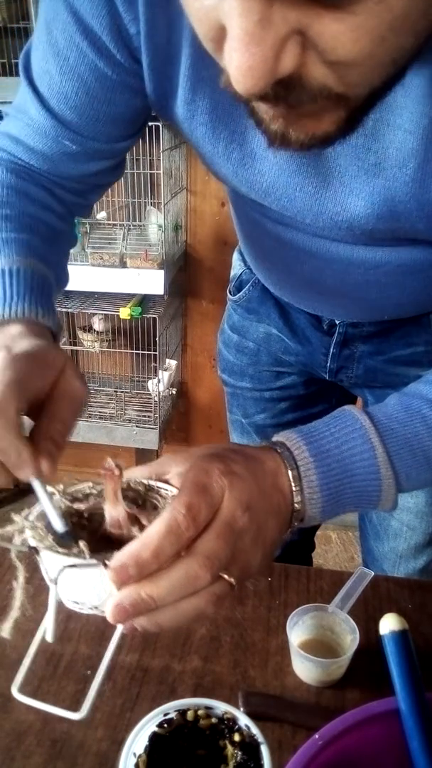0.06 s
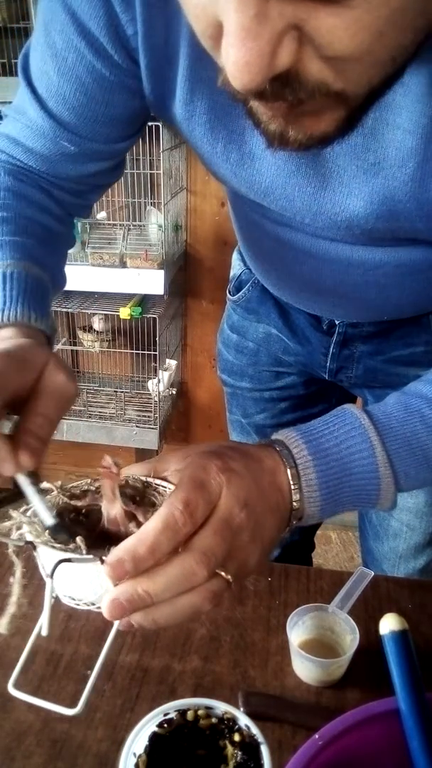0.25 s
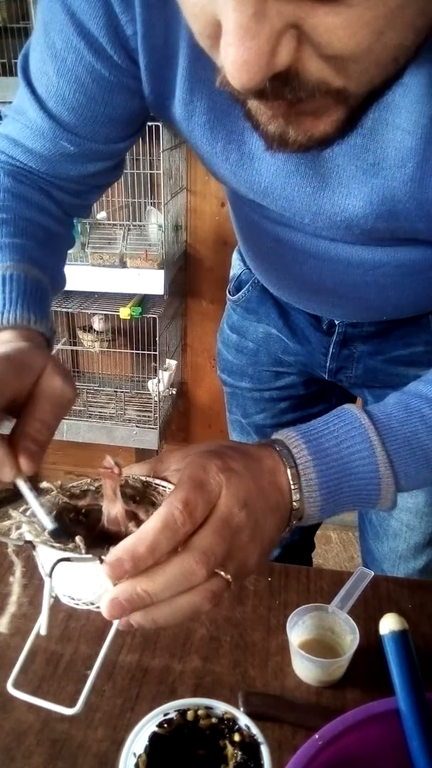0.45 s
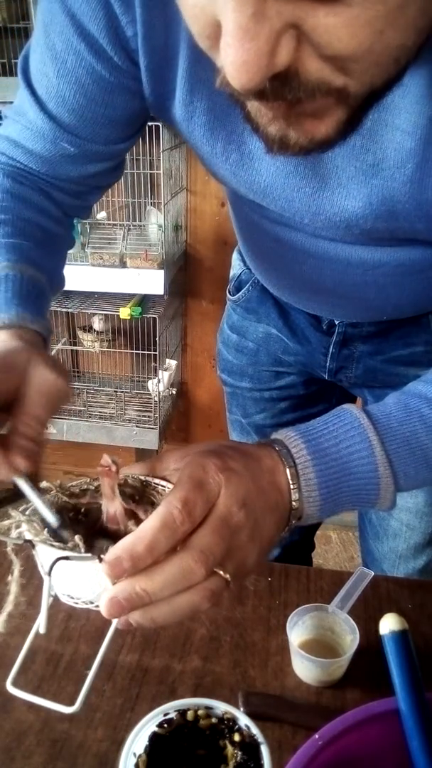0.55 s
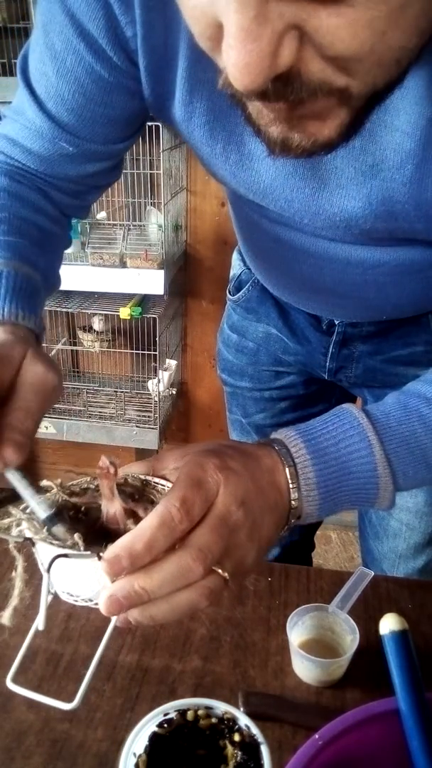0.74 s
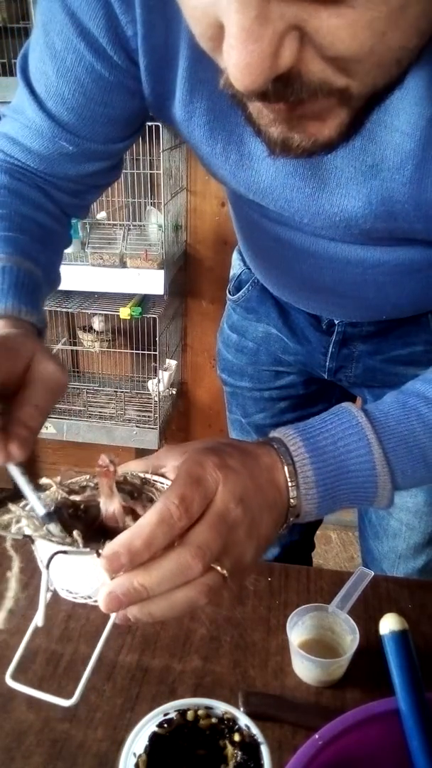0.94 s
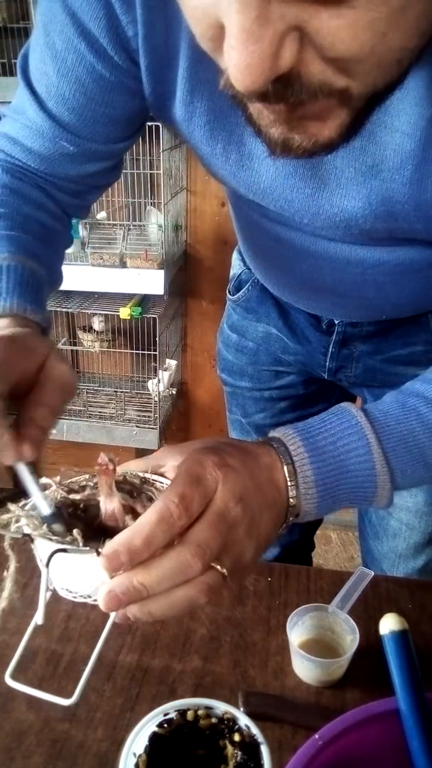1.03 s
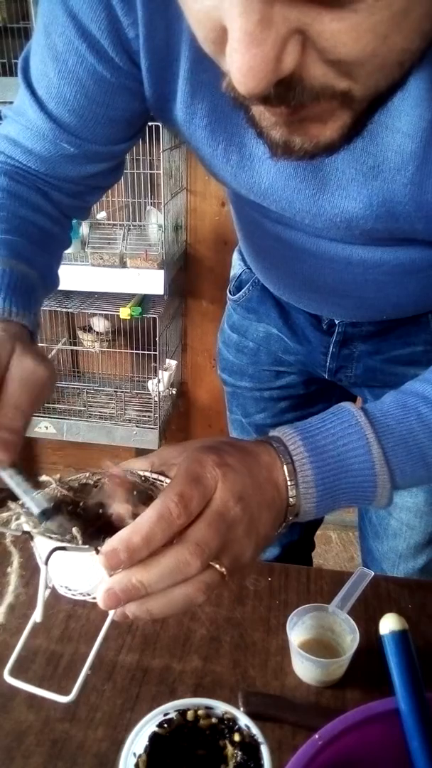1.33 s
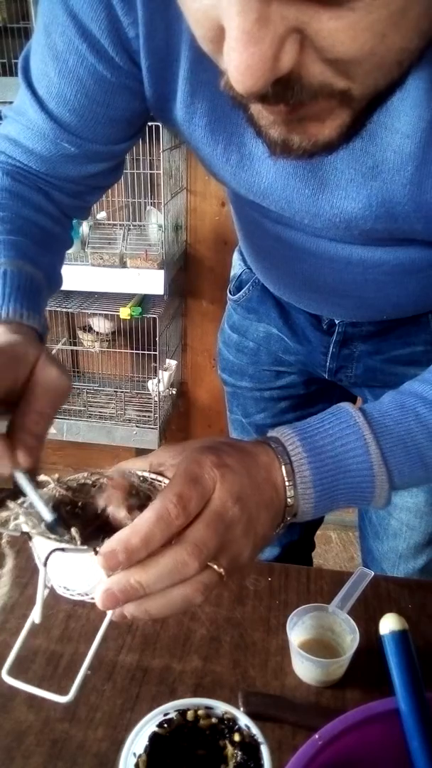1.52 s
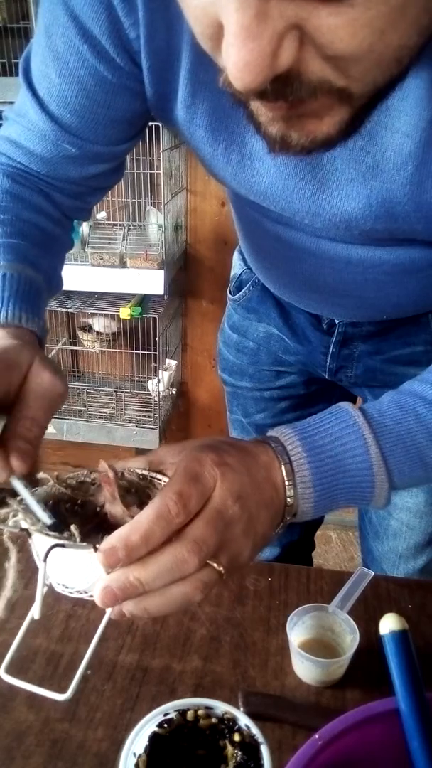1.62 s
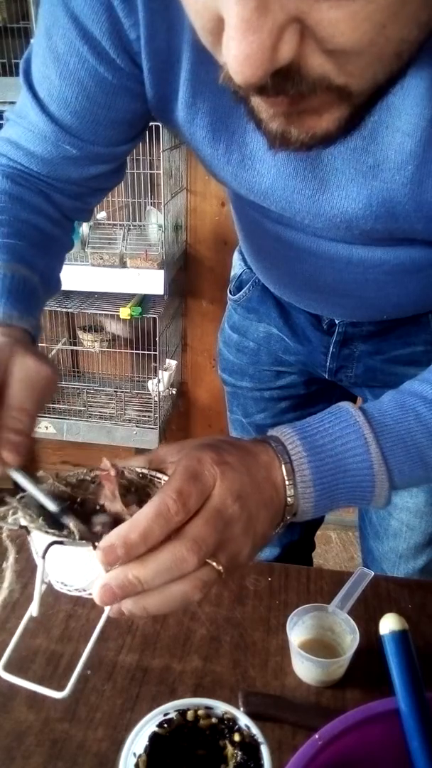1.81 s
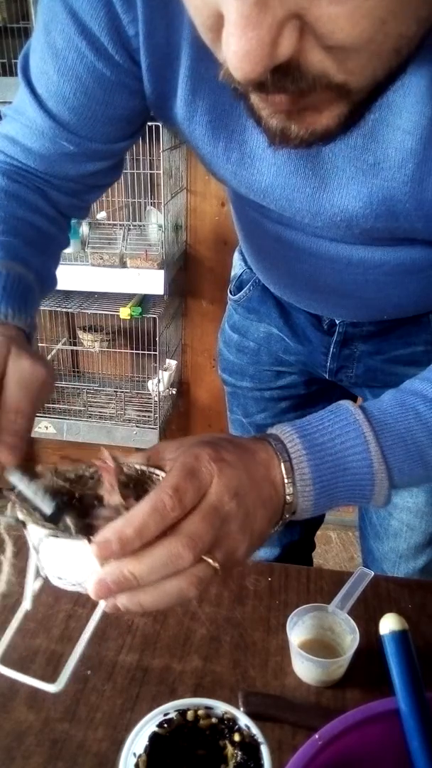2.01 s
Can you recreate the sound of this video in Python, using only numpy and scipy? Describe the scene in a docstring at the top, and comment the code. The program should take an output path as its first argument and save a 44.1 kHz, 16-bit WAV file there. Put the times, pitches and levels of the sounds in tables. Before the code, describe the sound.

Small caged birds chirp: three loud close cheeps, then a chick's rapid raspy begging calls indoors

```python
"""Canaries in a small, hard-walled bird room. Low room noise, far birds and microphone hiss run throughout,
with handling bumps and dull low tones (wavering sines) from the start. Soon one close bird gives three loud
rising cheeps, two gliding voices off a near wall. Rustles (bands of noise) set in, then a chick being hand-fed
begs in a quick run of raspy arched calls, two unsteady voices and hoarse noise, the last two very faint;
around them other birds, nearer and farther, add short chips, bent whistles with an octave above."""
import sys
import numpy as np
from scipy import signal
from scipy.fft import rfft, irfft
from scipy.io import wavfile

SR = 44100
rng = np.random.default_rng(int(sys.argv[2]) if len(sys.argv) > 2 else 0)


def int16_out(signal):
    """Quantize to a 16-bit WAV file."""
    q = np.round(np.clip(np.atleast_2d(signal).T, -1, 1) * 32767)
    wavfile.write(sys.argv[1], SR, q.astype(np.int16))


N = 90404

# Spectrum of the room noise. Each row: frequency in Hz, relative density in dB per Hz.
AIR_SPECTRUM = [(25, -20), (85, 1.5), (170, -4), (270, -7), (390, -4.5), (540, 4), (700, -0.5), (950, -6.5),
                (1500, -13), (2100, -24.5), (4200, -33.5), (6500, -38.5), (8000, -47.5)]
# Room noise over time. Each row: time in seconds, level in dB.
AIR_LEVEL = [(0, -51.5), (.1, -58), (.22, -59), (.41, -61.5), (.5, -54.5), (1.1, -59.5), (1.17, -58),
             (1.28, -54), (1.63, -58.5), (1.92, -56.5), (2.05, -59)]
# Spectrum of the microphone hiss. Each row: frequency in Hz, relative density in dB per Hz.
HISS_SPECTRUM = [(100, -14.5), (13500, 0.5), (15000, 10.5), (16000, 12)]
# Spectrum of the blurred far birds. Each row: frequency in Hz, relative density in dB per Hz.
TWITTER_SPECTRUM = [(2000, -13), (3400, -2.5), (4500, -1.5), (6300, -3), (8000, -37)]
HISS_DB, TWITTER_DB, TWITTER_SWELL_DB = -77, -69.5, 1.5  # the swell is rms

# Handling bumps. Each row: start in seconds, level before the envelope in dB, decay time constant in seconds.
BUMP_EVENTS = [(0.0, -50, 0.027), (.5, -60, 0.032), (0.718, -54, 0.05), (1.079, -56.5, .035),
               (1.525, -49.5, 0.037), (1.702, -52.5, 0.065), (1.809, -53, 0.072), (1.989, -59.5, 0.053)]
# Spectrum of a bump. Each row: frequency in Hz, relative density in dB per Hz.
BUMP_SPECTRUM = [(25, -19), (85, 5), (170, 3), (300, -20), (900, -19), (1800, -36), (4000, -46.5)]
# Soft handling rustles. Each row: start in seconds, length in seconds, direct level in dB, centre in Hz,
# width in octaves.
RUSTLE_EVENTS = [(.42, 0.064, -54.5, 800, 0.54), (.49, 0.23, -55, 630, 0.88), (.74, 0.15, -50, 722, 0.75),
                 (.88, 0.28, -58.5, 538, 0.97), (1.19, 0.11, -55.5, 2270, 0.61),
                 (1.33, 0.25, -59, 836, 0.87), (1.515, 0.084, -51.5, 926, 0.77),
                 (1.64, .11, -56.5, 1574, 0.54), (1.825, 0.03, -58.5, 1100, 0.51)]
# Dull low tones. Each row: start in seconds, length in seconds, direct peak level in dB, mean pitch in Hz.
DULL_TONE_EVENTS = [(0.0, 0.046, -59.5, 218), (.47, .09, -59.5, 230), (.59, 0.067, -49, 355),
                    (.725, 0.043, -50, 328.6), (.92, 0.051, -56, 321), (1.06, 0.036, -51, 355.6),
                    (1.72, 0.063, -56, 330.3)]

# Chips. Each row: start in seconds, length in seconds, level before colouring in dB, start pitch in Hz,
# middle pitch in Hz, end pitch in Hz, octave at the lowest pitch in dB, pitch jitter as an rms share,
# room level in dB.
CHIP_EVENTS = [(0.526, 0.045, -45.5, 3014, 2920, 3340, -29, 0.02, -3.5),
               (0.638, .022, -32, 3877, 3640, 3220, -29, 0.0048, 2),
               (1.012, 0.045, -37, 2887, 3296, 3640, -25, 0.013, -6),
               (1.215, .052, -39, 2693, 2730, 2644, 6.5, .022, -4),
               (1.24, 0.044, -30, 3737, 3552, 3200, -41, 0.011, -6),
               (1.279, .038, -41.5, 2634, 2575, 2420, 14.5, 0.028, -6),
               (1.709, .018, -47, 3510, 3310, 3040, -4.5, 0.011, 5),
               (1.722, 0.022, -45.5, 3160, 2946, 2650, 0, 0.029, -3),
               (1.772, 0.014, -29.5, 2870, 3637, 3040, -43, 0.0069, -7.5),
               (1.787, .016, -41.5, 2690, 2330, 2230, 8.5, .035, -3),
               (1.781, 0.0118, -43, 3120, 2885, 2550, -30.5, 0.033, 3.5)]
# The chick's begging calls. Each row: start in seconds, length in seconds, level before colouring in dB,
# top pitch in Hz, upper voice pitch ratio, upper voice in dB and rasp in dB, both on top of that level.
BEG_EVENTS = [(.550, .125, -39.5, 4000, 1.27, 7, 6.5), (.705, .130, -35, 3685, 1.17, 0.5, -6),
              (.865, .135, -33, 3710, 1.1, -6.5, -6), (1.035, 0.1, -34, 3786, 1.19, -1, -2.5),
              (1.190, .110, -36.5, 3620, 1.26, 2.5, -5.5), (1.345, .110, -35, 3448, 0.73, -21.5, -9),
              (1.465, 0.096, -40, 3390, 1.22, -0.5, -1.5), (1.655, 0.078, -60, 3700, 1.8, -11, 13),
              (1.895, 0.1, -67, 3630, 1.25, 8, 5)]
# Spectrum of the rasp. Each row: frequency in Hz, relative density in dB per Hz.
RASP_SPECTRUM = [(1800, -32), (2700, -19), (3400, -7), (4400, 9.5), (5300, -0.5), (6500, -5.5), (7300, -26),
                 (8300, -43), (12000, -49)]
# Colour that nest and cages give begging and chips. Each row: frequency in Hz, gain in dB.
NEST_GAIN = [(2000, -1), (2900, -3), (3250, -2.5), (3650, -1.5), (3950, -4), (4250, -1), (4700, -5),
             (5250, -1), (5850, -4), (6500, -0.5), (9500, -1)]
BEG_ARCH = .14  # share by which the pitch starts and ends below the top
BEG_SWELL = 0.57  # power of the arch that shapes the loudness
BEG_WOBBLE, UPPER_WOBBLE = .037, .0328  # rms share of the pitch, the first at the top of the arch
EDGE_HOARSENESS = 1.0  # extra pitch wobble where a begging call starts and ends

# Close cheeps. Each row: start in seconds, length before the release in seconds, level before colouring in dB,
# start pitch in Hz, top pitch in Hz, rise time constant in seconds, low voice in dB against the high one,
# buzz from 0 to 1, opening catch in dB before colouring.
CHEEP_EVENTS = [(0.223, 0.099, -23.5, 2890, 4615, 0.023, 1.5, 0.11, -48.5),
                (0.349, 0.034, -17, 2476, 4503, .011, -20.5, .5, -37),
                (.423, 0.027, -19, 2412, 4377, .009, -19, .5, -45)]
# Overtones of a cheep, 2nd then 3rd harmonic: level in dB before the fade and the buzz's cut.
OVERTONE_LEVELS = [-30.5, -45.5]
# Colour of the close bird's throat. Each row: frequency in Hz, gain in dB.
THROAT_GAIN = [(1500, -44), (2150, -16), (2600, -2), (4000, 4.5), (5300, -2.5), (6300, -7), (7500, -1.5),
               (8800, -7.5), (12000, -8)]
CHEEP_ATTACK_S = .026  # for a 72 ms cheep
CHEEP_RELEASE_S, CHEEP_SAG_DB_PER_S = .0049, -15
CHEEP_JITTER = .004  # rms share of the pitch
LOW_VOICE = .86  # pitch of the syrinx's second side against the first
LOW_VOICE_FADE_DB_PER_S = -37.5
HIGH_VOICE_DIP = .9  # share taken off the high voice at the onset
OVERTONE_ATTACK_S, OVERTONE_FADE_DB_PER_S = .004, -110
BUZZ_HZ, BUZZ_FADE_S = 620, .03
BUZZ_DEPTH = 1.9  # radians of phase at full buzz
CATCH_HZ, CATCH_S, CATCH_OCTAVE_DB = 2587, .014, 11.5  # the low catch that opens a cheep
CATCH_LEAD_S = .0072  # lead over the cheep at full buzz
WALL_S, WALL_DB = .0148, -6.5  # a near wall throws the cheeps back

ROOM_T60_S, EARLY_T60_S = .31, .058
EARLY_DB = 1.5  # early echoes against the tail
CHEEP_WET_DB, BEG_WET_DB = -5.5, -2.5
EDGE_HZ = 15600


def amp(db):
    """Decibels to gain."""
    return 10 ** (np.asarray(db) / 20)


def unit(x):
    """Scales to rms 1."""
    return x / np.sqrt(np.mean(x ** 2) + 1e-20)


def seconds(length):
    """Time axis of a sound of the given length in seconds."""
    return np.arange(0, length, 1 / SR)


def add(mix, s, sound):
    """Mixes a sound in at time s."""
    part = mix[max(round(s * SR), 0):][:len(sound)]
    part += sound[:len(part)]


def colour(x, points):
    """Filters by a table of frequency and gain, interpolated along log frequency."""
    f, db = np.transpose(points)
    bins = np.fft.rfftfreq(N, 1 / SR) + 1
    gain = amp(np.interp(np.log(bins), np.log(f), db))
    return irfft(rfft(x) * gain, N)


def noise(points):
    """Noise of rms 1 with the given spectrum."""
    return unit(colour(rng.standard_normal(N), points))


def wander(t, rate_hz):
    """Smooth chance, rms 1 over the whole scene, rolling off above the given rate."""
    f = np.fft.rfftfreq(N, 1 / SR)
    smooth = rfft(rng.standard_normal(N)) / (1 + (f / rate_hz) ** 4)
    return unit(irfft(smooth, N))[:len(t)]


def phase(hz):
    """Running phase of a pitch curve, in radians."""
    return 2 * np.pi * np.cumsum(hz) / SR


def room(x, wet_db):
    """Direct sound, quick echoes from table and cages, and the tail of the room."""
    t = np.arange(SR // 2) / SR
    taps = rng.standard_normal(len(t)) * (rng.random(len(t)) < 4000 / SR)  # about 4000 echoes a second
    early = unit(taps * (t > .002) * amp(-60 * t / EARLY_T60_S))
    build_up = np.minimum(t / 0.022, 1) ** 2
    late = unit(rng.standard_normal(len(t)) * build_up * amp(-60 * t / ROOM_T60_S))
    echoes = (amp(EARLY_DB) * early + late) / np.sqrt(len(t))
    return x + amp(wet_db) * signal.fftconvolve(x, echoes)[:N]


def play(table, sound, wet_db):
    """Plays one kind of event into the room."""
    out = np.zeros(N)
    for start, *row in table:
        add(out, start, sound(*row))
    return room(out, wet_db)


def bump(db, decay):
    """A handling bump: dull noise that starts softly and dies away exponentially."""
    t = np.arange(N) / SR
    return noise(BUMP_SPECTRUM) * amp(db) * np.minimum(t / 0.013, 1) * np.exp(-t / decay)


def background():
    """Low room noise, a blur of far birds, handling bumps and microphone hiss."""
    t = np.arange(N) / SR
    air = noise(AIR_SPECTRUM) * amp(np.interp(t, *np.transpose(AIR_LEVEL)))
    hiss = noise(HISS_SPECTRUM) * amp(HISS_DB)
    twitter = noise(TWITTER_SPECTRUM) * amp(TWITTER_DB + TWITTER_SWELL_DB * wander(t, rate_hz=7.5))
    out = air + hiss + twitter
    for start, db, decay in BUMP_EVENTS:
        add(out, start, bump(db, decay))
    return out


def dull_tone(length, db, hz):
    """A faint, wavering low tone that swells and fades."""
    t = seconds(length)
    tone = np.sin(phase(hz * (1 + 0.06 * wander(t, rate_hz=170))))
    return amp(db) * np.sin(np.pi * t / length) * tone


def rustle(length, db, hz, octaves):
    """A grainy swell of rubbing noise, in a bell-shaped band around its centre."""
    t = seconds(length)
    bell = [(hz * 2 ** (k * octaves), -4.5 * k * k) for k in range(-4, 5)]
    band = noise(bell)[:len(t)]
    swell = np.sin(np.pi * t / length) ** 0.3
    return amp(db + 0.83 * wander(t, rate_hz=30)) * swell * band


def chip(length, db, start_hz, middle_hz, end_hz, octave_db, jitter):
    """A short bent, unsteady whistle with its octave, which weakens as the pitch rises."""
    t = seconds(length)
    u = t / length
    bend = np.polyfit([0, .5, 1], [start_hz, middle_hz, end_hz], 2)
    hz = np.polyval(bend, u)
    p = phase(hz * (1 + jitter * wander(t, rate_hz=600)))
    octave = amp(octave_db) * (hz.min() / hz) ** 3 * np.sin(2 * p)
    return amp(db) * np.sin(np.pi * u) ** 0.54 * (np.sin(p) + octave)


def beg(length, db, top_hz, ratio, upper_db, rasp_db):
    """Two unsteady voices and a hoarse rasp rise and fall in one arch."""
    t = seconds(length)
    arch = np.sin(np.pi * t / length)
    hz = top_hz * (1 - BEG_ARCH * (1 - arch))
    wobble = BEG_WOBBLE * (1 + EDGE_HOARSENESS * (1 - arch))
    lower = np.sin(phase(hz * (1 + wobble * wander(t, rate_hz=720))))
    lower = lower * unit(amp(3 * wander(t, rate_hz=240)))  # unsteady loudness
    upper = np.sin(phase(hz * ratio * (1 + UPPER_WOBBLE * wander(t, rate_hz=500))))
    rasp = unit(noise(RASP_SPECTRUM)[:len(t)] * amp(2 * wander(t, rate_hz=270)))
    added = amp(upper_db) * upper + amp(rasp_db) * rasp
    return amp(db) * arch ** BEG_SWELL * (lower + arch * added)


def chick_and_other_birds():
    """The begging calls, and chips from birds at different distances, coloured by nest and cages."""
    begging = play(BEG_EVENTS, beg, BEG_WET_DB)
    chips = sum(play([row], chip, wet_db) for *row, wet_db in CHIP_EVENTS)
    return colour(begging + chips, NEST_GAIN)


def cheep_voice(t, hz, flutter, buzz):
    """One side of the syrinx: a jittery whistle whose faint overtones fade quickly, its loudness unsteady."""
    p = phase(hz * (1 + CHEEP_JITTER * wander(t, rate_hz=300)))
    p = p + flutter + 0.079 * wander(t, rate_hz=1230)
    overtone_gain = np.minimum(t / OVERTONE_ATTACK_S, 1) * amp(OVERTONE_FADE_DB_PER_S * t - 17 * buzz)
    overtones = 0
    for harmonic, db in enumerate(OVERTONE_LEVELS, start=2):
        overtones = overtones + amp(db + 1.1 * wander(t, rate_hz=190)) * np.sin(harmonic * p)
    return (np.sin(p) + overtone_gain * overtones) * (1 + 0.34 * wander(t, rate_hz=300))


def cheep(length, db, start_hz, top_hz, rise, low_db, buzz):
    """Both syrinx sides slide to a held pitch, low side first; the onset buzzes, overtones faint and soon gone."""
    t = seconds(length + CHEEP_RELEASE_S)
    low_top_hz = LOW_VOICE * top_hz
    high_hz = top_hz + (start_hz - top_hz) * np.exp(-t / rise)
    low_hz = low_top_hz + (start_hz - low_top_hz) * np.exp(-t / (.95 * rise))
    buzzing = BUZZ_DEPTH * np.sin(phase(BUZZ_HZ * (1 + .25 * wander(t, 300))))
    flutter = buzz * np.exp(-t / BUZZ_FADE_S) * (buzzing + .5 * wander(t, 1200))
    high_gain = 1 - HIGH_VOICE_DIP * np.exp(-(t / rise) ** 2)
    low_gain = amp(low_db + LOW_VOICE_FADE_DB_PER_S * t)
    high = high_gain * cheep_voice(t, high_hz, flutter, buzz)
    low = low_gain * cheep_voice(t, low_hz, flutter, buzz)
    attack_s = CHEEP_ATTACK_S * (length / 0.072) ** .5
    attack = np.minimum(t / attack_s, 1) ** 0.78
    release = np.clip((t[-1] - t) / CHEEP_RELEASE_S, 0, 1)
    return (high + low) * attack * release * amp(db + CHEEP_SAG_DB_PER_S * t)


def catch(db):
    """The low catch that opens a cheep: a brief unbent whistle, its octave the stronger part."""
    return chip(CATCH_S, db, CATCH_HZ, CATCH_HZ, CATCH_HZ, CATCH_OCTAVE_DB, jitter=0.034)


def close_bird():
    """Each cheep opens with a low catch, passes the throat and bounces off the near wall."""
    out = np.zeros(N)
    for start, *shape, buzz, catch_db in CHEEP_EVENTS:
        add(out, start, cheep(*shape, buzz))
        add(out, start - CATCH_LEAD_S * buzz, catch(catch_db))
    out = colour(out, THROAT_GAIN)
    add(out, WALL_S, amp(WALL_DB) * out)
    return room(out, CHEEP_WET_DB)


def scene():
    """All birds, the handling, the low tones and the room, in mono."""
    rustles = play(RUSTLE_EVENTS, rustle, wet_db=-7)
    low_tones = play(DULL_TONE_EVENTS, dull_tone, wet_db=0)
    cheeps = close_bird()
    return (cheeps + chick_and_other_birds() + rustles + low_tones + background())[None]


def record(dry):
    """The recorder's band limit: a steep low-pass."""
    lowpass = signal.firwin(511, EDGE_HZ, window=("kaiser", 9), fs=SR)
    return signal.oaconvolve(dry, lowpass[None], "same")


dry = scene()
out = record(dry)
int16_out(out)
```